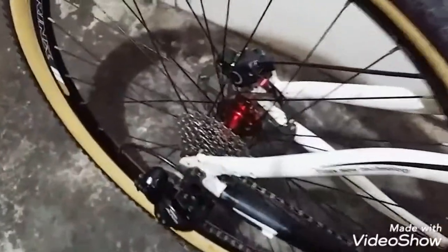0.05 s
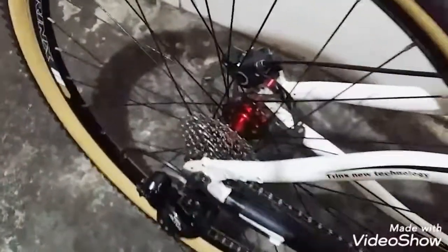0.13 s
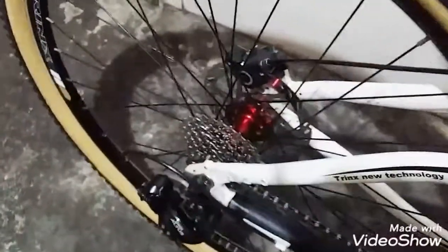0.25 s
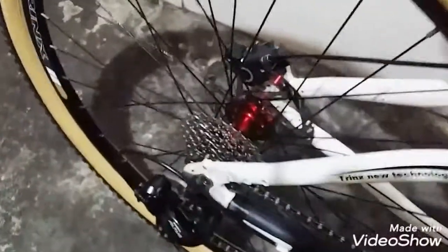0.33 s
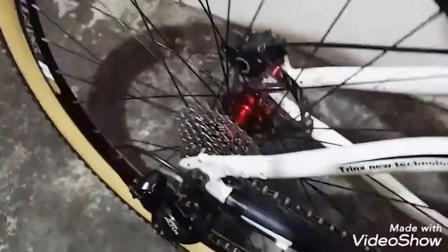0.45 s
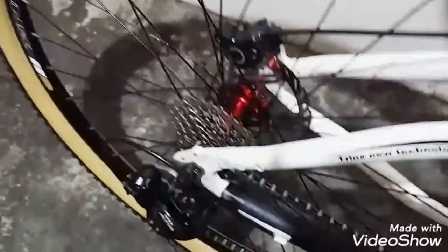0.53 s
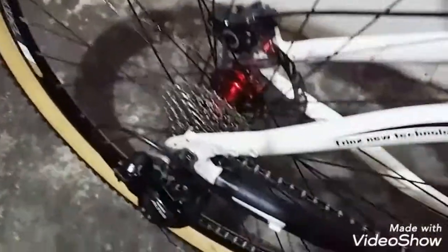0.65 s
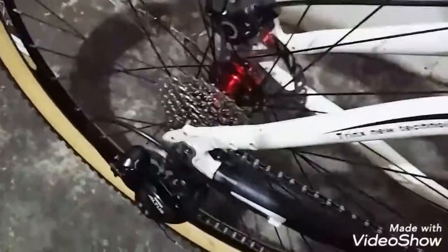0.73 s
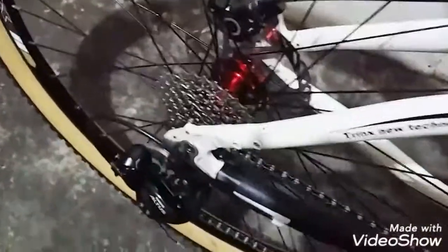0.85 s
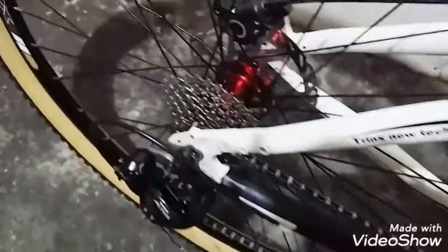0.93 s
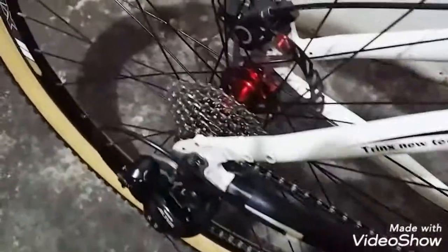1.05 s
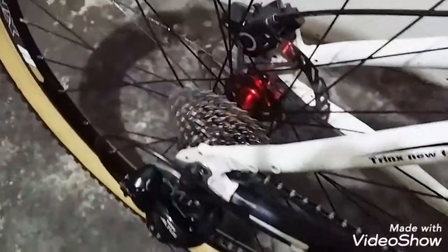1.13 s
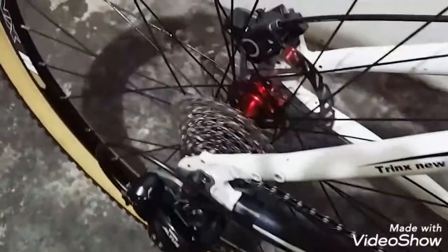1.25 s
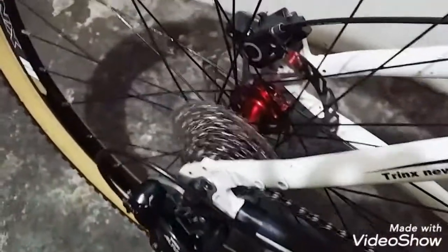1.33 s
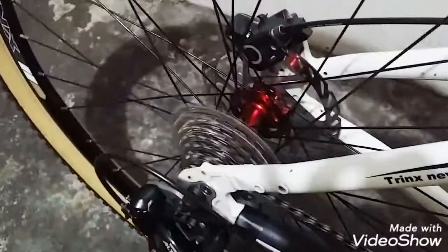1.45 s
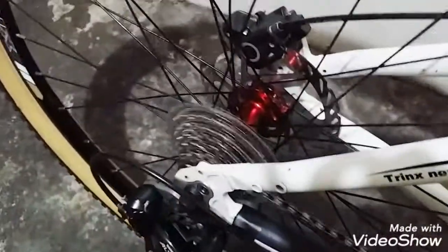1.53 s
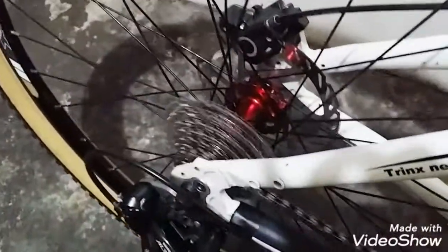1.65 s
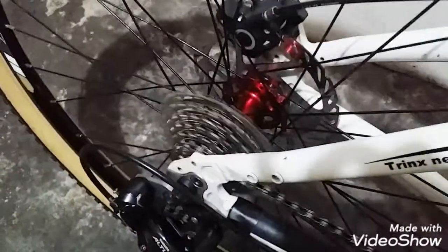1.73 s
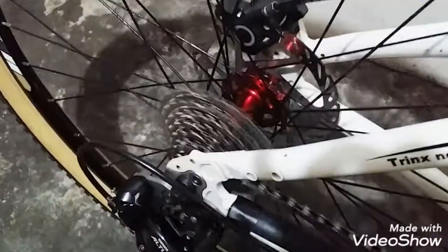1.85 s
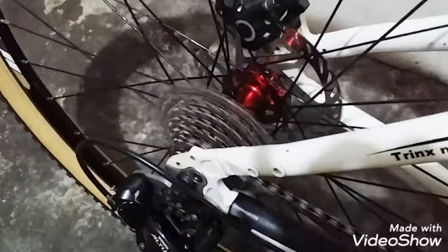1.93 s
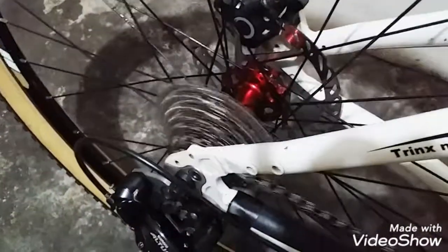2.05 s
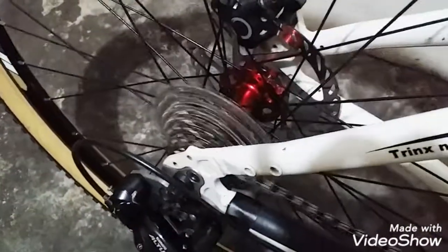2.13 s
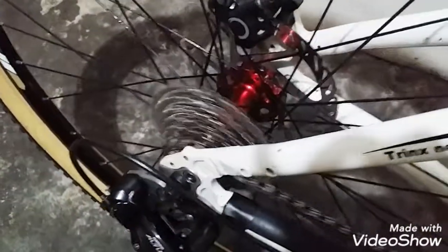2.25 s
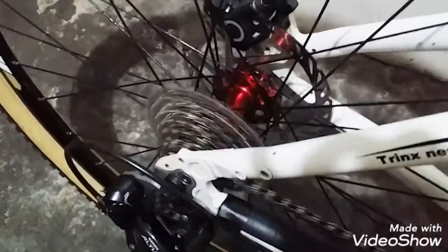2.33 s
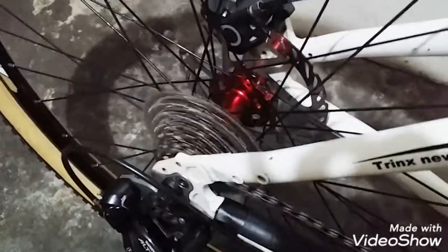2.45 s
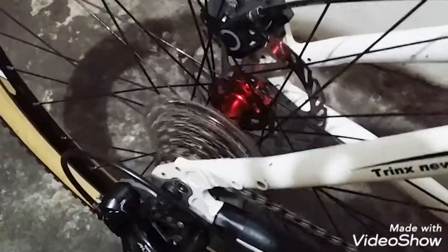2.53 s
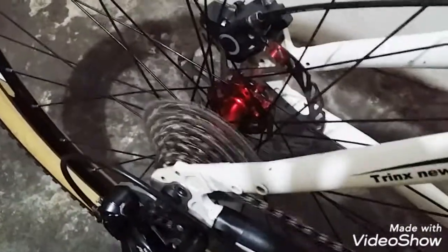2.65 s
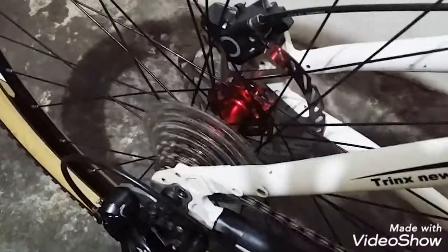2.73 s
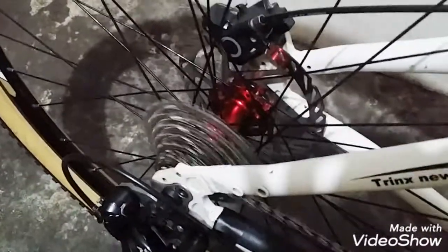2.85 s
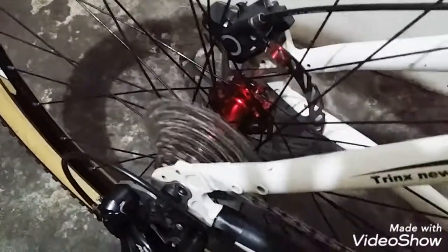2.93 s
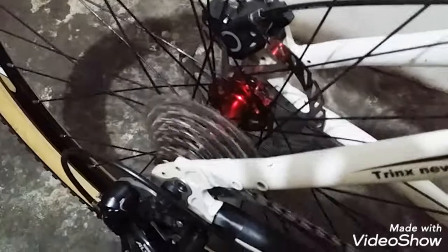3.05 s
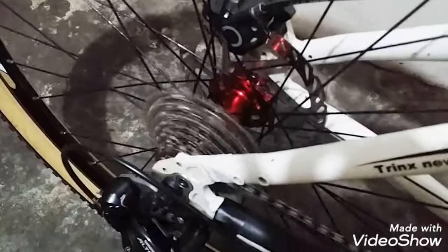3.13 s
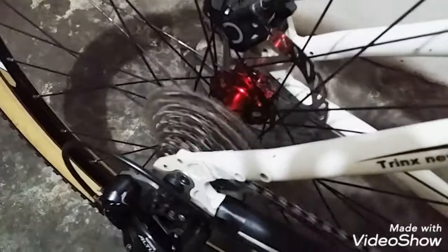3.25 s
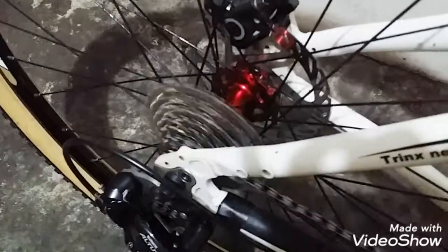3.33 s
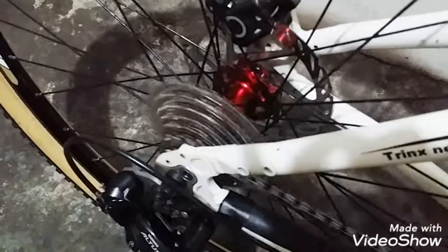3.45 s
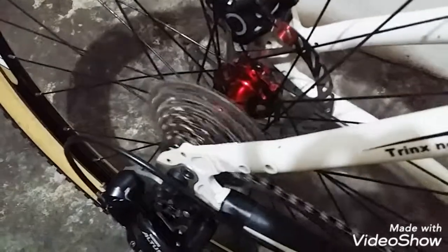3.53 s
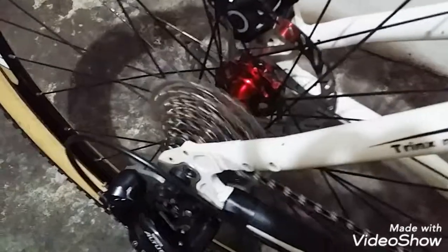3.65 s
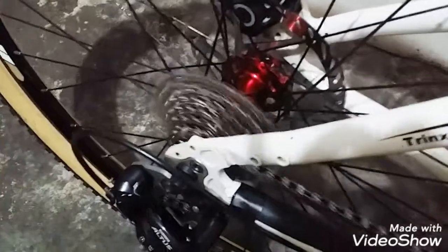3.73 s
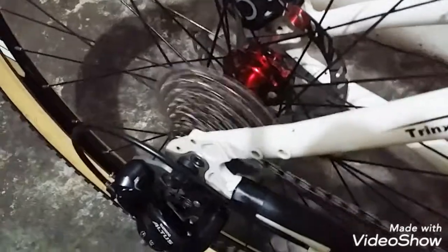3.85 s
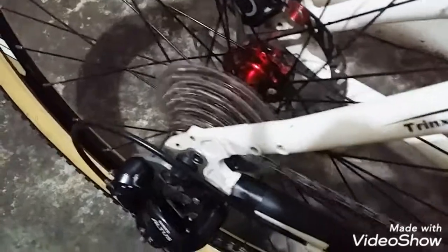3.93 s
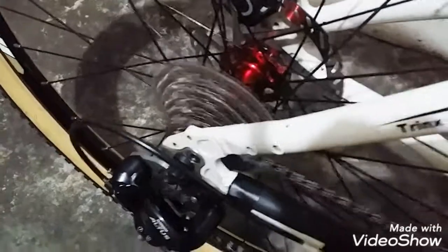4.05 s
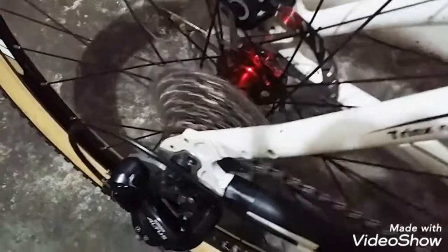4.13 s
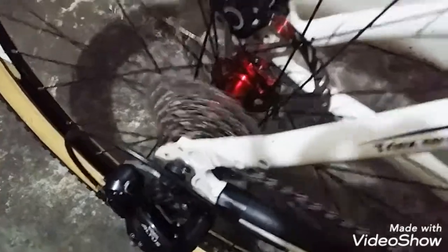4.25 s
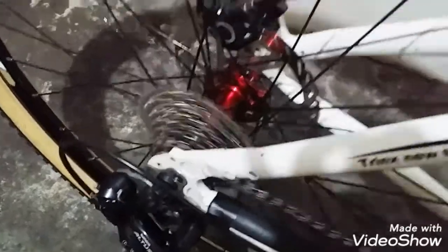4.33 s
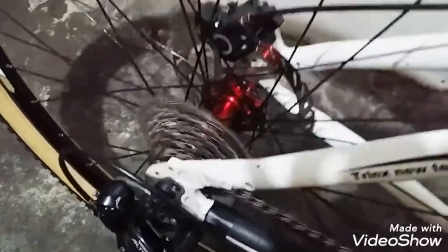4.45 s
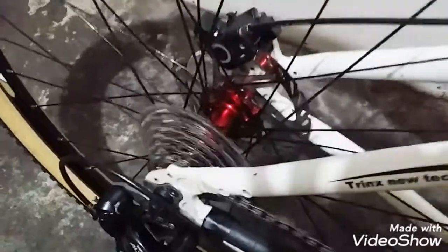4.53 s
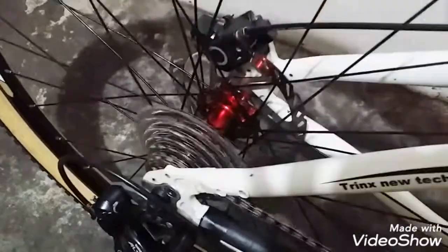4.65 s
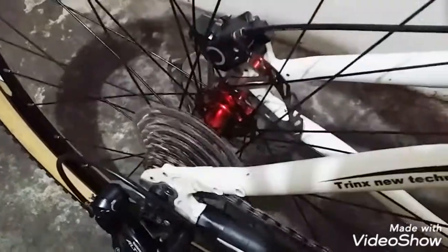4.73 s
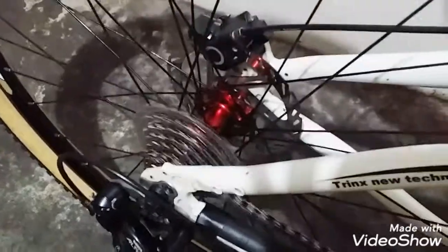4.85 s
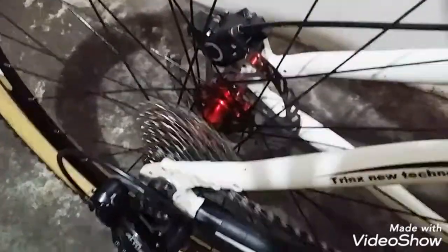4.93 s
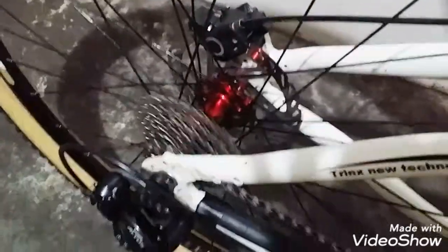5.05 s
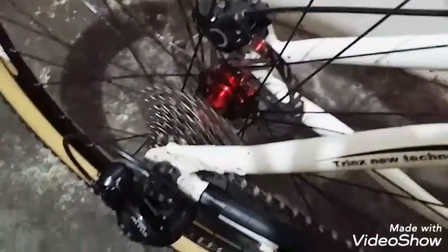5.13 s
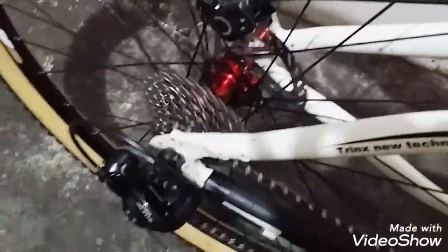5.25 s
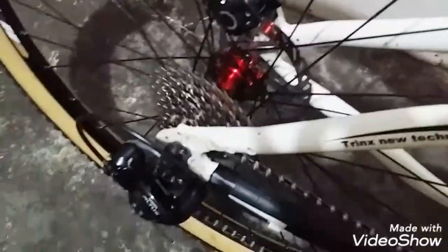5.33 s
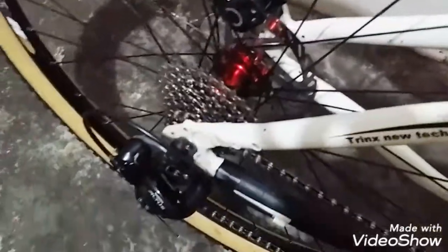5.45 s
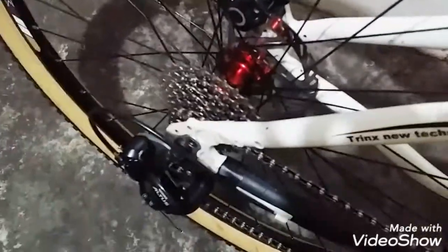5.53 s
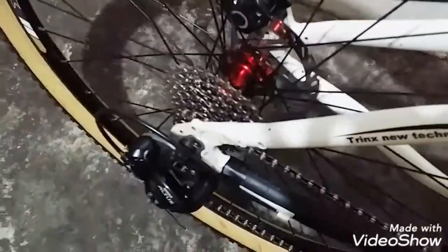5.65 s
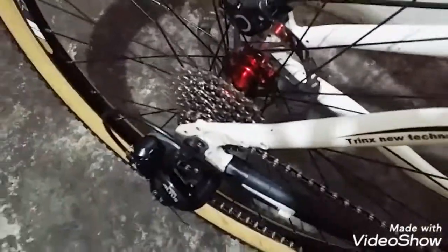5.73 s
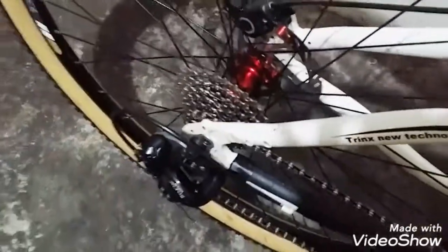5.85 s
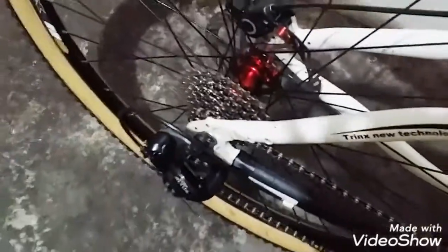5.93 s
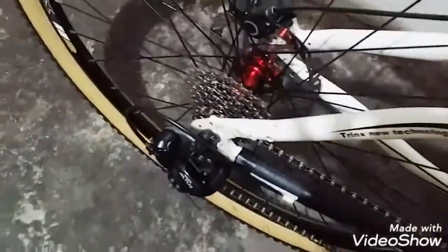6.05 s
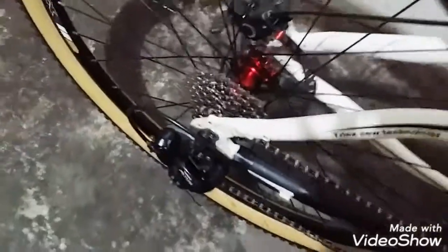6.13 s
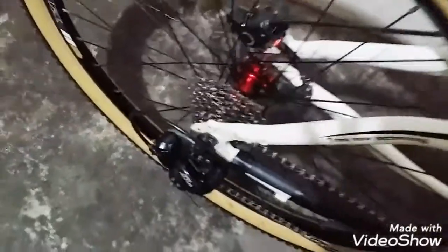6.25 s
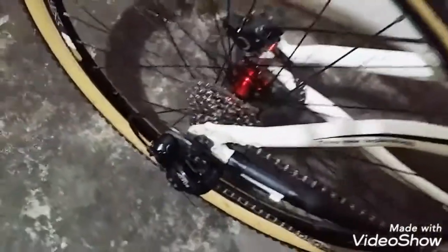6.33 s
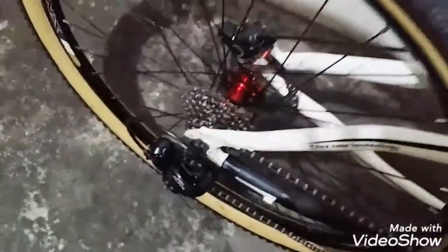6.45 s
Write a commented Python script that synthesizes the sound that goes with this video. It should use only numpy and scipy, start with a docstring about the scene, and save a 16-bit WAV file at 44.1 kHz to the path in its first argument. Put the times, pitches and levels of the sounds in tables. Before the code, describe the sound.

In a small hard room, a bicycle hub clicks, speeds into a bright rattling buzz for several seconds, then slows to single clicks and fades.

```python
"""First a quiet rumbling room with light ticks and soft brushing; then a bicycle's cranks are spun backwards.
The freehub pawls snap over the ratchet teeth: single clicks, a buzz, then single clicks again.
Each snap is a burst of noise with a crack and a short ring, sent through hub and sprocket resonances.
Shaped noise makes the chain, rumble, rush and hiss; wavering tones whine, decaying sines knock.
The bicycle echoes in a small hard room, and everything fades out at the end."""
import sys
import numpy as np
from scipy import signal
from scipy.fft import rfft, irfft
from scipy.io import wavfile

SR = 44100
rng = np.random.default_rng(int(sys.argv[2]) if len(sys.argv) > 2 else 0)


def file_out(sig):
    """Save sig as 16-bit WAV at sys.argv[1]."""
    # one column per channel
    cols = np.atleast_2d(sig).T
    # limit, then scale
    lim = np.clip(cols, -1, 1)
    pcm = np.round(lim * 32767).astype(np.int16)
    wavfile.write(sys.argv[1], SR, pcm)


N = 286650
TIME = np.arange(N) / SR


def from_db(db):
    """Turns decibels into an amplitude gain."""
    return 10 ** (np.asarray(db) / 20)


def rms_one(x):
    """Scales the whole signal to an rms of 1."""
    return x / np.sqrt(np.mean(x ** 2) + 1e-20)


def in_time(rows):
    """Each column of a curve, read at every sample."""
    seconds, *columns = np.transpose(rows)
    return [np.interp(TIME, seconds, column) for column in columns]


def at_hz(points, hz):
    """A curve over frequency, read on a logarithmic frequency axis."""
    points = np.array(points)
    return np.interp(np.log(np.maximum(hz, 1)), np.log(points[:, 0]), points[:, 1])


def coloured(x, spectrum):
    """Filters x with a smooth gain curve in dB over frequency."""
    gain = from_db(at_hz(spectrum, np.fft.rfftfreq(N, 1 / SR)))
    return irfft(rfft(x) * gain, N)


def noise_below(hz, shape):
    """Slow random motion: noise kept below the given frequency, rms 1."""
    lowpass = signal.butter(2, hz, fs=SR, output="sos")
    return rms_one(signal.sosfilt(lowpass, rng.standard_normal(shape)))


def swell(start, length, level_db, rise, fall):
    """A gain that rises, holds for a while and falls; the slopes are in dB per second."""
    early = np.maximum(start - TIME, 0)
    late = np.maximum(TIME - start - length, 0)
    return from_db(np.maximum(level_db - rise * early - fall * late, -200))


def resonate(x, hz, width, lift_db):
    """Lifts one resonance out of x, so that it rings on after each blow."""
    r = np.exp(-np.pi * width / SR)
    zeros = np.array([1, 0, -1]) * (1 - r * r) / 2
    poles = [1, -2 * r * np.cos(2 * np.pi * hz / SR), r * r]
    ring = signal.lfilter(zeros, poles, x + 1e-18)
    return x + (from_db(lift_db) - 1) * ring


def body(x, modes, swing=lambda: 0):
    """Rings a stereo sound through a table of resonances; swing adds each one's changing lift in dB."""
    left, right = x
    for hz, width, left_db, right_db in modes:
        swing_db = swing()
        left = resonate(left, hz, width, left_db + swing_db)
        right = resonate(right, hz, width, right_db + swing_db)
    return np.array([left, right])


def clatter(times, gains, t60, crack, crack_t60):
    """The envelope of steel contacts: a brief crack each, then countless close modes die away together."""
    blows = np.zeros(N)
    samples = np.clip(np.round(times * SR).astype(int), 0, N - 1)
    np.add.at(blows, samples, gains ** 2)  # blows add up in power

    def dying(seconds):
        return signal.lfilter([1], [1, -from_db(-120 / (seconds * SR))], blows + 1e-18)

    return np.sqrt(dying(t60) + crack ** 2 * dying(crack_t60))


# likeness of the background at the two ears: (frequency [Hz], likeness [0-1])
EAR_LIKENESS = [(60, 0.92), (125, 0.98), (250, 0.86), (500, 0.47), (1000, 0.13), (2000, 0)]


def diffuse(spectrum):
    """Stereo noise from all around, alike at both ears only in the bass; rms 1."""
    alike = np.clip(at_hz(EAR_LIKENESS, np.fft.rfftfreq(N, 1 / SR)), -1, 1)
    mid, side = rfft(rng.standard_normal((2, N)))
    ears = np.sqrt(1 + alike) * mid + np.sqrt(1 - alike) * side * [[1], [-1]]
    return rms_one(coloured(irfft(ears, N), spectrum))


# colours of deep rumble, low rumble, soft rush and thin hiss: (frequency [Hz], relative density [dB per Hz])
DEEP_COLOUR = [(20, -26), (36, -21), (48, -3.5), (58, -12), (71, 4), (82, 3), (105, -17), (160, -57)]
RUMBLE_COLOUR = [(60, -24), (85, -15), (100, -0.5), (118, 2.5), (131, -4), (146, 0), (195, -6.5),
                 (222, -11.5), (280, -10.5), (370, -22.5), (600, -54)]
RUSH_COLOUR = [(200, -47.5), (350, 2.5), (500, -1), (750, -2.5), (1000, -6.5), (1450, -7), (1800, -11.5),
               (2800, -12.5), (4500, -40)]
HISS_COLOUR = [(1500, -14), (3000, 8.5), (4500, 4), (6200, 5.5), (7500, -1.5), (10000, -8), (13000, -10.5),
               (16000, -21)]
# slow swells of the same four layers, before their trims: (time [s], level [dB])
DEEP_SWELL = [(0, -33.5), (.4, -40), (.75, -38.5), (1.68, -41), (1.8, -35), (1.95, -42), (2.95, -46.5),
              (3.45, -36.5), (4.05, -44), (5, -41.5), (6, -41)]
RUMBLE_SWELL = [(0, -33), (1.2, -32), (1.8, -33.5), (2.6, -38.5), (3.05, -41), (3.35, -35.5), (4.8, -35.5),
                (5.05, -32), (5.4, -36), (6, -33)]
RUSH_SWELL = [(0, -39), (.8, -42), (1.7, -41.5), (3.15, -46.5), (4.3, -47), (5.3, -40.5), (6, -41.5)]
HISS_SWELL = [(0, -51.5), (.5, -48.5), (.62, -52.5), (5.4, -50), (6.4, -56.5)]
# low resonances of the room: (frequency [Hz], width [Hz], left lift [dB], right lift [dB])
LOW_ROOM_MODES = [(119.6, 11.5, 5, 3), (145, 3.2, 2.5, 5), (176.6, 5.7, 6, 3.5), (190.8, 7.1, 6, 4.5),
                  (237.7, 9.8, 7.5, 5), (289, 21, 4.5, 4.5), (325, 9.6, 5.5, 0.5), (434, 14, 7, -1)]


def background(deep_db, rumble_db, rush_db, hiss_db, left_db):
    """Four beds of shaped noise, from deep rumble to thin hiss, lifted by the low room resonances."""
    layers = [(DEEP_COLOUR, DEEP_SWELL, deep_db),
              (RUMBLE_COLOUR, RUMBLE_SWELL, rumble_db),
              (RUSH_COLOUR, RUSH_SWELL, rush_db),
              (HISS_COLOUR, HISS_SWELL, hiss_db)]
    total = 0
    for colour, level, trim_db in layers:
        total = total + from_db(in_time(level)[0] + trim_db) * diffuse(colour)
    return body(total, LOW_ROOM_MODES) * from_db([[left_db], [-left_db]])


# a faint far whine swells twice, before its trim:
# (time of peak [s], frequency [Hz], level [dB], rise [dB/s], fall [dB/s])
WHINE_SWELLS = [(.35, 686, -45, 45, 33), (5.26, 731, -47, 80, 59)]


def whine(width_hz, level_db):
    """A narrow tone from far off swells and dies away, its cosine and sine parts wavering at random."""
    tone = 0
    for peak_s, hz, db, rise, fall in WHINE_SWELLS:
        tone = tone + swell(peak_s, 0, db + level_db, rise, fall) * np.exp(2j * np.pi * hz * TIME)
    cosine_waver, sine_waver = noise_below(width_hz, (2, 2, N))
    mid, side = cosine_waver * tone.real + sine_waver * tone.imag
    return mid + .5 * side * [[1], [-1]]


# dull bumps in the rumble: (time [s], frequency [Hz], level [dB])
LOW_BUMPS = [(1.169, 187, -20), (1.789, 80.6, -19.5), (3.278, 104, -27), (3.411, 110, -24)]


def bumps():
    """Dull low knocks, alike at both ears: sines that rise fast and die away."""
    total = 0
    for start_s, hz, db in LOW_BUMPS:
        gain = swell(start_s, 0, db, rise=3000, fall=496)
        total = total + gain * np.sin(2 * np.pi * hz * (TIME - start_s))
    return total


# the hand drives the cranks in uneven pushes, then lets them slow down: (time [s], rate [ratchet teeth/s])
SPIN_SPEED = [(1.124, 7.59), (1.477, 26.63), (1.784, 22.51), (1.996, 24.87), (2.158, 33.88), (2.318, 27.77),
              (2.75, 34.3), (2.9, 40.41), (3.223, 34.59), (3.53, 35.33), (3.731, 29.15), (4.029, 41.3),
              (4.161, 33.35), (4.453, 36.14), (4.827, 29.11), (5.074, 21.85), (5.278, 19.25), (5.44, 7.79)]


def tooth_rate():
    """Ratchet teeth passing per second; the cassette stands still before and after the spin."""
    return np.interp(TIME, *np.transpose(SPIN_SPEED), left=0, right=0)


CHAIN_RUN_DB, CRUISE_TEETH_PER_S = -52.5, 32  # running level at cruising speed, before the flutter
# colour of the chain: (frequency [Hz], relative density [dB per Hz])
CHAIN_COLOUR = [(400, -28), (580, -24.5), (670, -2.5), (750, 5.5), (870, -6.5), (1050, -3.5), (1350, -5),
                (1600, 0), (2000, -21), (3500, -20.5)]
# rubbing as the cranks slow down: (start [s], length [s], level [dB])
CHAIN_RUBS = [(5.0, 0.41, -42)]


def chain(flutter_db, flutter_hz):
    """The chain runs dully and unevenly through the derailleur, louder with speed, and rubs as it slackens."""
    running = from_db(CHAIN_RUN_DB) * tooth_rate() / CRUISE_TEETH_PER_S
    flutter = from_db(flutter_db * noise_below(flutter_hz, N))
    rubbing = sum(swell(*rub, rise=138, fall=53.5) for rub in CHAIN_RUBS)
    return (running * flutter + rubbing) * diffuse(CHAIN_COLOUR)


# decay of the room echoes: (frequency [Hz], t60 [s])
ROOM_DECAY = [(300, 0.079), (2300, 0.55), (3400, 0.48), (6800, 0.25), (13600, 0.23)]


def room_tail(first_echo_s, build_s):
    """A diffuse stereo tail that builds up after the first wall echo, each band with its own decay."""
    t = TIME[:SR // 2]
    edges = np.geomspace(150, 19200, 8)
    tail = 0
    for low, high in zip(edges, edges[1:]):
        bandpass = signal.butter(2, [low, high], "band", fs=SR, output="sos")
        band = signal.sosfilt(bandpass, rng.standard_normal((2, len(t))))
        tail = tail + band * from_db(-60 * t / at_hz(ROOM_DECAY, np.sqrt(low * high)))
    tail = tail * np.clip((t - first_echo_s) / build_s, 0, 1)
    return tail / np.sqrt(np.sum(tail ** 2, axis=1, keepdims=True))


def room(x, wet_db, count=12):
    """The hand-held microphone wanders, so one pattern of echoes gives way to the next."""
    place, wet = np.linspace(0, count - 1, N), 0
    for k in range(count):
        nearness = np.sqrt(np.maximum(1 - np.abs(place - k), 0))
        tail = room_tail(first_echo_s=0.0083, build_s=0.0067)
        wet = wet + signal.fftconvolve(x * nearness, tail, axes=1)[:, :N]
    return x + from_db(wet_db) * wet


# light ticks before and after the spin, before colouring: (time [s], level [dB])
LIGHT_TICKS = [(0.027, -43.5), (.18, -46), (.497, -42), (5.587, -45), (6.015, -46), (6.214, -29.5)]
# soft brushing at the start and near the end, before colouring: (start [s], length [s], level [dB])
BRUSH_STROKES = [(0.21, 0.34, -54.5), (6.136, .015, -46.5), (6.246, 0.027, -38)]
# colour of ticks and brushing: (frequency [Hz], gain [dB])
TICK_COLOUR = [(2000, 0), (4500, 0.5), (6300, 8.5), (8500, -1), (12500, 5), (15500, -10)]


def settling(t60):
    """Light ticks and soft brushing while the cassette stands still: noise bursts and swells."""
    seconds, tick_db = np.transpose(LIGHT_TICKS)
    ticks = clatter(seconds, from_db(tick_db), t60=t60, crack=1.3, crack_t60=.004)
    brush = sum(swell(*stroke, rise=499, fall=377) for stroke in BRUSH_STROKES)
    return coloured(np.hypot(ticks, brush) * rng.standard_normal((2, N)), TICK_COLOUR)


TEETH_PER_TURN = 24


def once_a_turn(number, top_tooth):
    """Swings between -1 and 1 with every turn of the cassette."""
    return np.cos(2 * np.pi * (number - top_tooth) / TEETH_PER_TURN)


TOOTH_JITTER_S = .0003
# teeth outside the table below; STAGGER is the share of a tooth's time from first to last pawl
FIRST_PAWL_DB, LAST_PAWL_DB, STAGGER = -0.25, 0.37, .067
# teeth heard on their own, at a crawl or standing out of the buzz, before the source levels:
# (time [s], first pawl [dB], last pawl [dB], first to last pawl [s], ring of the sprockets [dB])
SINGLE_CLICKS = [(1.1242, -1, 1, 0.0085, 2), (1.2219, 2, -2.5, 0.0075, 1), (1.2903, -13.5, 4, 0.0028, -0.5),
                 (1.3462, 5.5, -6, 0.0056, 2.5), (1.3922, -8, 5.5, 0.003, 3),
                 (1.4342, -5.5, 2, 0.0033, 2.5), (1.4764, -7.5, 6.5, 0.0024, 0), (1.514, -1, -1, 0.0038, 2),
                 (1.552, -1.5, 1, 0.0054, 4), (1.5914, -2, 1.5, 0.0014, 5), (1.631, 1, -4.5, 0.0021, -7.5),
                 (1.6709, -2.5, 2, 0.003, 6.5), (1.7139, -4, 0.0, 0.002, -3.5), (1.758, -9, 0, 0.0032, -1),
                 (1.803, -11, 2.5, 0.002, 4.5), (1.8458, 1, -1, 0.0025, 1.5), (1.8878, -4, 4.5, 0.0029, 1),
                 (1.9301, -5, 5, 0.0026, -3), (1.9709, -1, -2, 0.0041, 0.5), (2.011, 0.5, 0.5, 0.0033, -13),
                 (2.049, -1.5, 2.5, 0.0025, 1), (2.1762, -3, 3.5, 0.0028, -7.5),
                 (2.3426, -3, 3.5, 0.0031, 5.5), (2.413, -0.5, 4, 0.0025, 1), (2.607, 5, -5, 0.0015, -7),
                 (2.6994, 2, 0, 0.0025, -7), (2.7589, 2.5, -5.5, 0.0023, 2.5),
                 (2.892, 4, -1.5, 0.0012, -5.5), (2.9929, 4, -1.5, 0.0013, -5),
                 (3.0189, -3, -1.5, 0.002, -2), (3.045, -2.0, -5, 0.0014, 3), (3.269, 1, -0.5, 0.0018, -4),
                 (3.2971, -2.0, -3.5, 0.0013, 2), (3.3836, 6, -2, 0.0032, -4),
                 (3.4965, 2.5, 1.5, 0.0012, -3.0), (3.6427, -1.5, 5, 0.0018, 1.5),
                 (3.7436, 1, -3, 0.0018, 4.0), (3.7752, 1, 2.5, 0.0036, 6.0),
                 (3.8383, -2, 2.5, 0.0028, 7.5), (3.9237, 2, 1.5, 0.0015, -6),
                 (3.9756, -6.5, -2, 0.0016, -2.5), (4.0245, -1, 0.5, 0.0015, 1),
                 (4.2478, 6.5, 1.5, 0.0032, 0), (4.3063, 4, -0.5, 0.0022, -1),
                 (4.3633, -4.5, 4, 0.00085, 4.5), (4.4193, -4, 2.5, 0.0025, 3.5),
                 (4.4477, 3, -7, 0.0029, 6.5), (4.5596, -4, -2, 0.0022, 2), (4.6204, -1.5, 4.5, 0.0011, -6),
                 (4.8467, -3.5, 4, 0.0027, -2), (4.8828, 0, -0.5, 0.0041, 2.0), (4.9205, 0, 2.5, 0.0032, 1),
                 (4.9605, 3, 0.5, 0.0047, -4.5), (4.999, 2, -1, 0.0048, 2),
                 (5.0425, 5.5, -2.5, 0.0036, 1.0), (5.0881, -1.5, 2.5, 0.0031, 0.5),
                 (5.1345, 0, 1, 0.0026, 2), (5.1824, 0, 4.5, 0.0021, 5.5), (5.2322, -1.0, 0, 0.0017, -10),
                 (5.285, 0.5, 1.5, 0.0064, 6), (5.3436, -6, 3, 0.0035, 6), (5.4305, -3, 3.5, 0.011, -1)]


def teeth(uneven_db, scatter, swell_db, loudest_tooth):
    """One row per tooth, as in SINGLE_CLICKS: pawls land further apart at low speed, ring swells each turn."""
    passed = np.cumsum(tooth_rate()) / SR
    number = np.arange(int(passed[-1]) + 1)
    reached = np.searchsorted(passed, number, side="right") / SR
    chance = rng.standard_normal((len(number), 4)).T
    rows = np.column_stack([reached + TOOTH_JITTER_S * chance[0],
                            FIRST_PAWL_DB + uneven_db * chance[1],
                            LAST_PAWL_DB + uneven_db * chance[2],
                            STAGGER * np.gradient(reached) * np.exp(scatter * chance[3]),
                            swell_db * once_a_turn(number, loudest_tooth)])
    for click in SINGLE_CLICKS:
        rows[np.argmin(np.abs(reached - click[0]))] = click
    return rows


def last_tooth(reached):
    """The number of the latest tooth at every sample."""
    return np.maximum(np.searchsorted(reached, TIME, side="right") - 1, 0)


RIGHT_EAR_LAG = 8  # samples


def steel(reached, repeat_share, ear_share, turn_share, size=8192):
    """Dense steel noise: teeth partly repeat the one before and each turn; some left reaches the right late."""
    tooth_voices = rng.standard_normal((TEETH_PER_TURN, 2, size))
    own = tooth_voices[np.arange(len(reached)) % TEETH_PER_TURN]
    fresh = rng.standard_normal(own.shape)
    rings = turn_share * own + np.sqrt(1 - turn_share ** 2) * fresh
    rings = signal.lfilter([np.sqrt(1 - repeat_share ** 2)], [1, -repeat_share], rings, axis=0)
    tooth = last_tooth(reached)
    since_tooth = np.arange(N) - (reached * SR).astype(int)[tooth]
    left, right = rings[tooth, :, since_tooth % size].T
    late_left = np.roll(left, RIGHT_EAR_LAG)
    return np.array([left, np.sqrt(1 - ear_share ** 2) * right + ear_share * late_left])


def varied(x, reached, low_hz, high_hz, spread_db, count):
    """Every tooth is struck at a slightly different spot, so each stretch of its spectrum varies in strength."""
    place = np.interp(np.fft.rfftfreq(N, 1 / SR), [low_hz, high_hz], [0, count])
    spectrum, tooth, out = rfft(x), last_tooth(reached), 0
    for k in range(count + 1):
        band = irfft(spectrum * np.maximum(1 - np.abs(place - k), 0), N)
        strength = from_db(spread_db * rng.standard_normal(len(reached)))
        out = out + band * strength[tooth]
    return out


# late surges of the sprocket ring after each tooth: (delay [s], relative level [dB])
RING_SURGES = [(.0015, -9), (.004, -1), (.0135, -2)]
# broad colour of the sprocket ring: (frequency [Hz], gain [dB])
RING_COLOUR = [(1200, -25), (1750, -8.5), (2100, -3.5), (2600, 3.5), (2950, -6), (3500, -14), (6000, -39)]


def sprockets(reached, force_db):
    """The cassette answers each tooth late and low, its ring surging again and again."""
    delay, surge_db = np.transpose(RING_SURGES)
    times = reached[:, None] + delay
    gains = from_db(force_db[:, None] + surge_db)
    envelope = clatter(times, gains, t60=0.07, crack=0.49, crack_t60=0.01)
    return coloured(envelope * steel(reached, repeat_share=0.12, ear_share=0.11, turn_share=0.36), RING_COLOUR)


# broad colour of a pawl landing: (frequency [Hz], gain [dB])
SNAP_COLOUR = [(300.0, -53.5), (700.0, -5), (1050.0, -18.5), (1400.0, -6.5), (1720.0, -15), (2100.0, -4.0),
               (2700.0, -7), (3500.0, -1.5), (5000.0, 5), (5800.0, 2), (7600.0, 6), (9600.0, 3.5),
               (12000.0, 3), (15500.0, 2.5)]


def pawls(reached, first_db, last_db, spread_s, count=3):
    """At every tooth the pawls drop one after another, each with a sharp crack and a short ring."""
    times = np.linspace(reached, reached + spread_s, count)
    gains = from_db(np.linspace(first_db, last_db, count))
    envelope = clatter(times, gains, t60=0.057, crack=2.25, crack_t60=0.0021)
    return coloured(envelope * steel(reached, repeat_share=0.36, ear_share=0.1, turn_share=0.45), SNAP_COLOUR)


# rings of the hub shell and pawls, then of the sprockets, before each tooth's flare:
# (frequency [Hz], width [Hz], left lift [dB], right lift [dB])
HUB_MODES = [(3266, 97, 4.5, 8.5), (4540, 25, 4, 9.5), (6296, 162, 7.5, 12), (7340, 4.5, 0, 6),
             (8570, 130, 2, -4), (9238.0, 130, 5, 5.5), (9900, 170, 1.5, 3), (10418.0, 420, 0.5, 4),
             (11220, 120, 2, 5.5), (11820, 520, 3.5, 6.5), (13420, 231.0, 3.5, 8.5),
             (14449.0, 63.0, 4.5, 9.5), (15344.0, 161.0, 0.5, 5.5)]
SPROCKET_MODES = [(1245, 37, 10, 12), (1508.0, 290, 0, 4), (1966, 294, 4, 8.5), (2170, 37.0, 3, 8),
                  (2259, 43, 7, 9), (2417, 36, 6, 9), (2483, 26, 7, -1.5), (2510, 51, 5, 5.5),
                  (2740, 180, 4, 6.5), (2950, 38, 5.5, 6.5)]


def freehub(level_db, sprocket_db, right_db, flare_db):
    """Pawls and cassette, struck at every tooth, ring through the hub; each tooth flares other resonances."""
    rows = teeth(uneven_db=0.76, scatter=.3, swell_db=0.5, loudest_tooth=9.5)
    reached, first_db, last_db, spread_s, ring_db = rows.T
    snaps = pawls(reached, first_db, last_db, spread_s)
    snaps = varied(snaps, reached, low_hz=500, high_hz=15580, spread_db=2.0, count=32)
    ring = sprockets(reached, ring_db + sprocket_db)
    ring = varied(ring, reached, low_hz=1965, high_hz=2970, spread_db=1.3, count=6)
    tooth = last_tooth(reached)

    def flare():
        return flare_db * rng.standard_normal(len(reached))[tooth]

    rung = body(snaps + ring, HUB_MODES + SPROCKET_MODES, flare)
    return from_db(level_db) * rung * from_db([[0], [right_db]])


def scene():
    """The bicycle in its room, over the quiet surroundings."""
    surroundings = background(deep_db=2.5, rumble_db=-1.5, rush_db=-1.0, hiss_db=2.0, left_db=-0.07)
    surroundings = surroundings + whine(width_hz=20, level_db=2.5) + bumps()
    bicycle = settling(t60=0.043) + freehub(level_db=-26.0, sprocket_db=1.0, right_db=-0.67, flare_db=1.44)
    return surroundings + chain(flutter_db=5.0, flutter_hz=27) + room(bicycle, wet_db=-6.0)


FADE_START_S, FADE_END_S, CUTOFF_HZ = 5.78, 6.477, 15450


def record(dry):
    """Everything fades out at the end, and a steep lowpass cuts the top."""
    top_cut = signal.ellip(10, .2, 80, CUTOFF_HZ, fs=SR, output="sos")
    fade = np.interp(TIME, [FADE_START_S, FADE_END_S], [1, 0])
    return signal.sosfilt(top_cut, dry * fade)


dry = scene()
out = record(dry)
file_out(out)
```